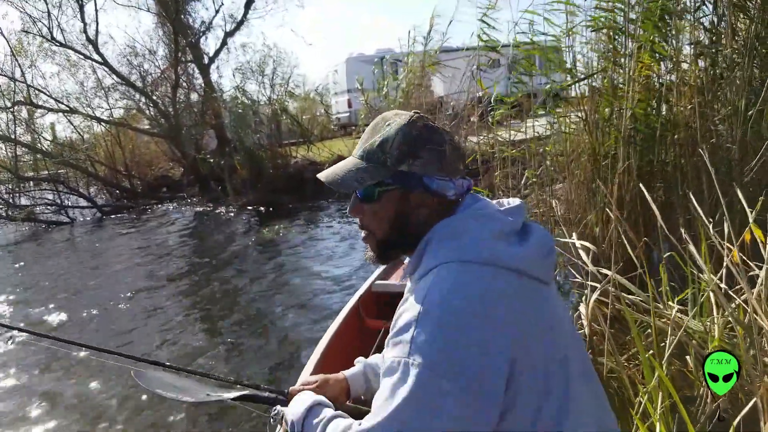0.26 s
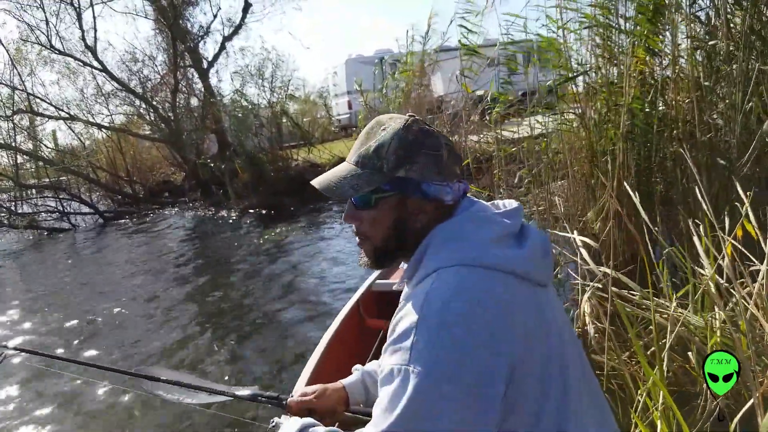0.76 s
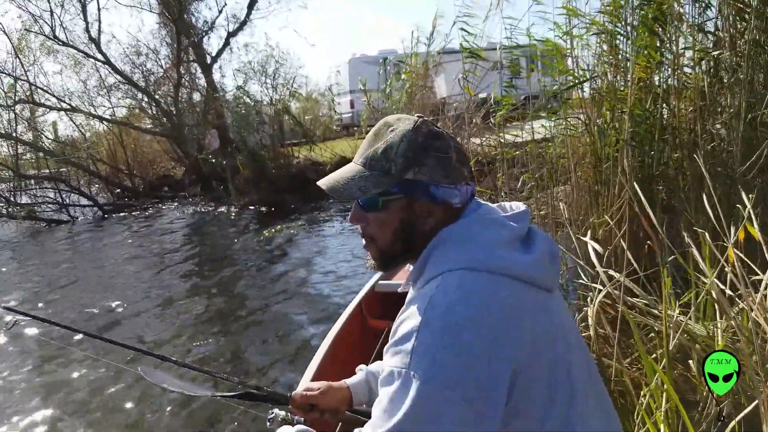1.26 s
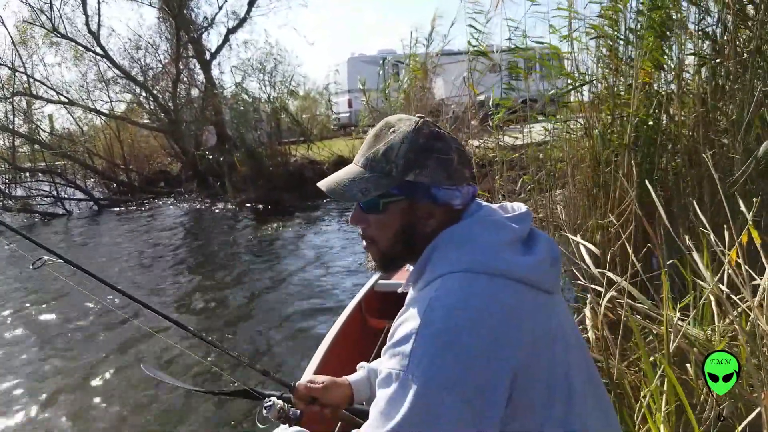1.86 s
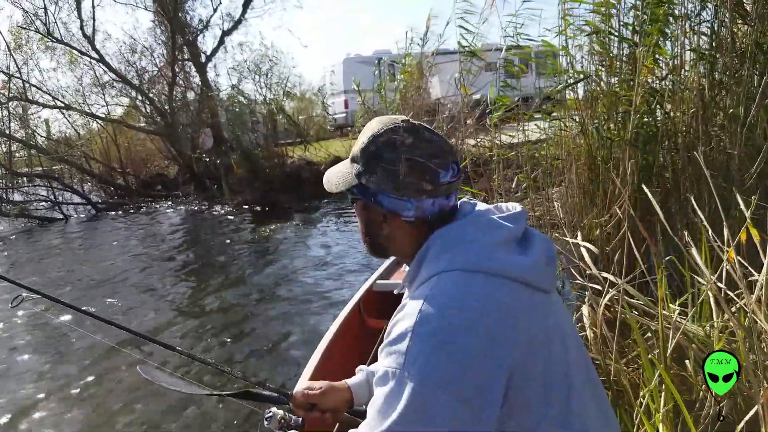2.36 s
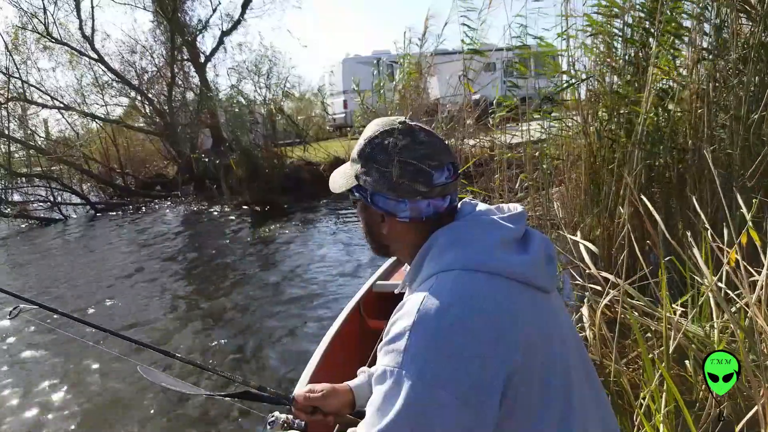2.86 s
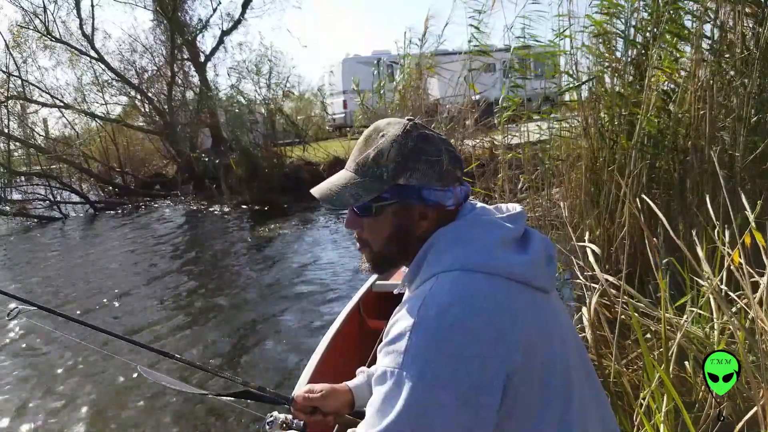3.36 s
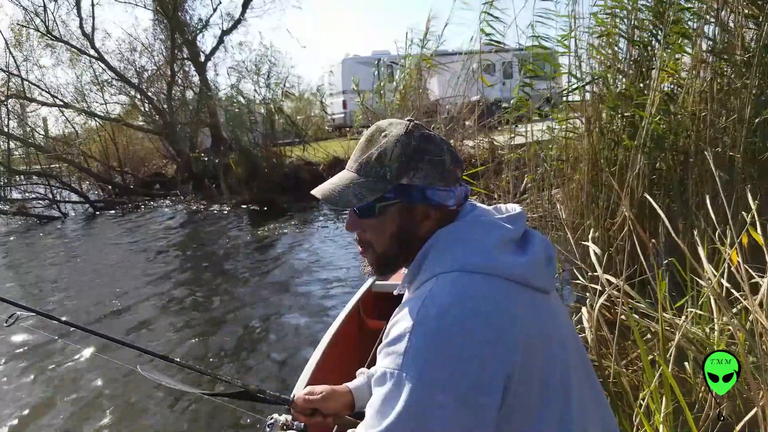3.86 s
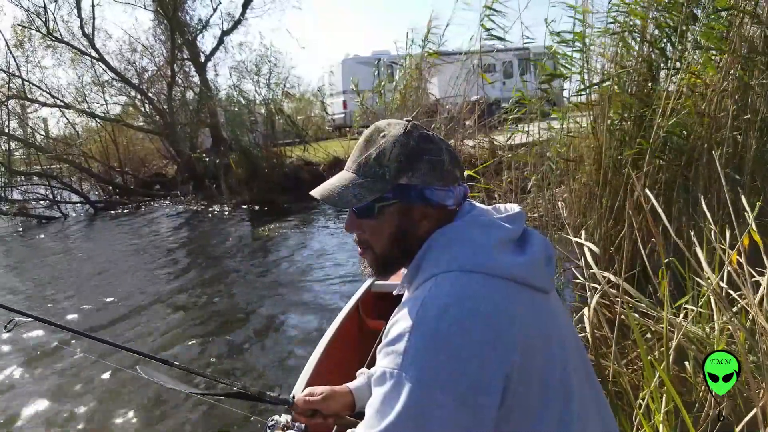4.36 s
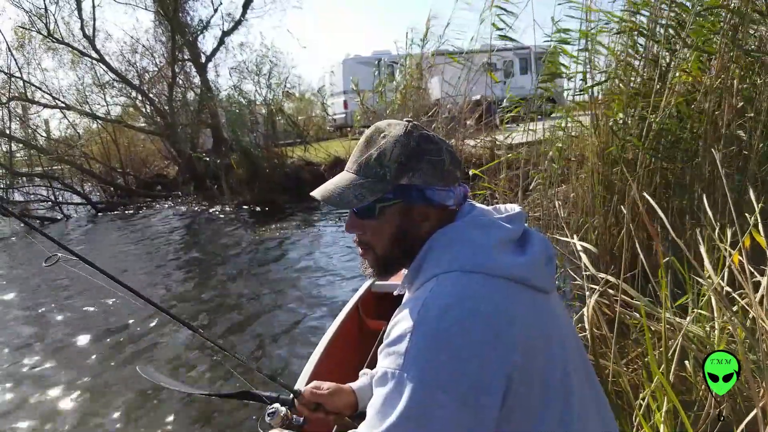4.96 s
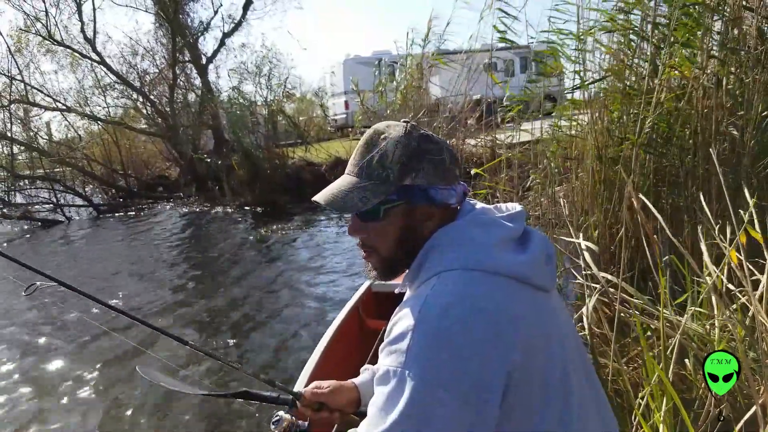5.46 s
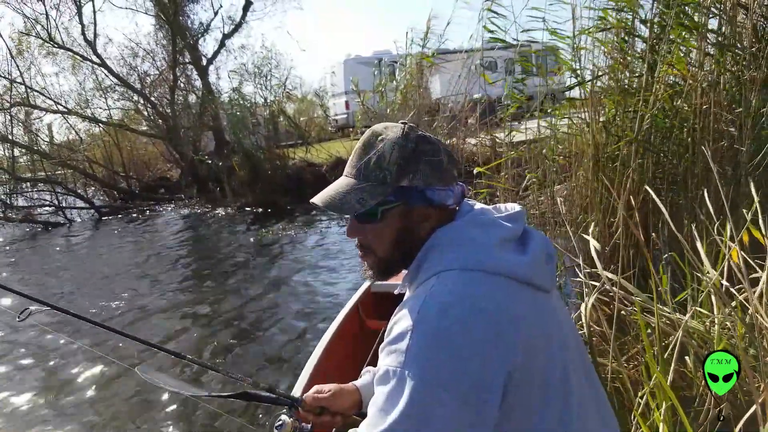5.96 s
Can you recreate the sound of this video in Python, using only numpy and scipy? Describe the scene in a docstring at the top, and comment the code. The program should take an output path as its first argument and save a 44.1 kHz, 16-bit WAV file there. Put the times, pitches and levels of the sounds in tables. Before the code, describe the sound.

Water laps and splashes in short spells against a boat, over rustling reeds and low, thumping gusts of wind.

```python
"""A small boat lies among reeds on a breezy marsh. From the start dry leaves rub and hiss, wind buffets both
microphone ports, and a few trapped bubbles plink by the hull. From about 2 to 3 s wavelets slap, tick and
gurgle against it, throwing a little spray. After a lull the water splashes again near 5 s, and once more
near 6 s, just as the hardest buffet thumps the ports."""
import sys
import numpy as np
from scipy import signal
from scipy.fft import rfft, irfft, next_fast_len
from scipy.io import wavfile

SR = 44100
rng = np.random.default_rng(int(sys.argv[2]) if len(sys.argv) > 2 else 0)


def inscribe(sig):
    """Save sig as 16-bit PCM at rate SR to the path in sys.argv[1].

    A 1-D sig is mono; a 2-D sig holds one channel per row.
    Samples are clipped to [-1, 1] before scaling.
    """
    pcm = np.round(np.clip(np.atleast_2d(sig).T, -1, 1) * 32767)
    wavfile.write(sys.argv[1], SR, pcm.astype(np.int16))


N = 273890

# Wavelets hitting the hull: (time [s], level [dB], pitch [Hz])
SLAPS = [(.655, -55, 877), (.685, -54.5, 520), (0.771, -54, 467), (1.165, -57, 760), (1.246, -45.5, 388),
         (1.596, -50.5, 401), (1.625, -52, 698), (1.7, -52, 764), (1.938, -39, 568), (2.017, -43.5, 500),
         (2.154, -36.5, 888), (2.238, -43, 530), (2.262, -33.5, 735), (2.271, -42, 870),
         (2.276, -40.5, 436), (2.341, -42.5, 620), (2.427, -34.5, 540), (2.45, -36, 790), (2.521, -35, 595),
         (2.534, -40.5, 673), (2.556, -39.5, 550), (2.628, -41, 795), (2.648, -35.5, 862),
         (2.722, -48, 620), (2.806, -37, 732), (2.83, -44.5, 533), (2.88, -42, 750), (2.9, -47.5, 560),
         (3.428, -54.5, 500), (3.585, -53, 452), (4.688, -59, 855), (4.719, -59, 970), (4.812, -54.5, 756),
         (5.004, -46.5, 460), (5.099, -38, 410), (5.126, -36.5, 417), (5.143, -39, 340), (5.15, -37.5, 620),
         (5.166, -36.5, 371), (5.185, -46, 904), (5.198, -49, 586), (5.455, -52.5, 547), (5.58, -34, 202),
         (5.647, -50.5, 443), (5.856, -50.5, 572), (5.909, -41.5, 916), (6.054, -36, 258)]


def slaps():
    """A wavelet smacks the hull: a splat of noise with the hollow tone of an air pocket."""
    return bursts(SLAPS, t60=0.075, octaves=0.41, grain_db=3.0, attack_s=0.00301, pan_db=1.0, hollow=0.34)


# Featured bubbles: (time [s], level [dB], pitch [Hz], splashy share [0-1])
BUBBLES = [(0.057, -47, 3180, 0.01), (.619, -47, 2660, 0.4), (.645, -51, 2480, 0.2), (.662, -52, 2890, 0.8),
           (.665, -59, 3650, .2), (.68, -54, 4050, .4), (.763, -53, 2600, 0.8), (0.791, -52, 2740, 0.6),
           (.922, -54, 2350, 0.7), (1.104, -52, 3010, 0.4), (1.178, -56, 1130, 0.3),
           (1.321, -48.5, 1500, 0.4), (1.386, -52, 3100, 0.9), (1.71, -46, 1515, 0.35),
           (1.718, -51, 2850, 0.6), (1.728, -60, 3670, .4), (1.7272, -47, 1045, 0.25),
           (1.7768, -48, 4300, 0.8), (1.8477, -37, 2340, 0.3), (1.847, -43.5, 1295, 0.25),
           (1.871, -37.5, 1540, 0.3), (1.937, -43, 4520, 0.15), (1.9444, -26.5, 1600, 0.2),
           (1.956, -41.5, 3670, 0.4), (2.017, -44, 1490, 0.92), (2.035, -44, 2550, 0.7),
           (2.08, -38.5, 1510, 0.15), (2.116, -35.5, 2310, 0.6), (2.146, -26, 2410, 0.4),
           (2.162, -32, 2000, 0.76), (2.168, -36, 3590, 0.21), (2.17, -36.5, 1464, 0.45),
           (2.256, -34.5, 1050, 0.93), (2.317, -37.5, 1254, 0.04), (2.338, -34, 1490, 1),
           (2.395, -42, 1690, 0.5), (2.433, -38, 1470, 0.13), (2.437, -41, 2320, 0.2),
           (2.456, -35, 1510, 0.66), (2.523, -39.5, 1550, 0.9), (2.536, -40, 2670, 0.6),
           (2.593, -35.5, 2607, 0.34), (2.649, -39.5, 4050, 0.6), (2.661, -42.5, 1420, 0.3),
           (2.694, -39.5, 1575, 0.34), (2.725, -47.5, 2630, 0.5), (2.808, -45.5, 3400, 0.9),
           (2.821, -44, 1860, 0.6), (2.862, -42, 1730, 0.96), (2.87, -45, 2180, 0.6),
           (2.865, -48, 2930, 0.24), (2.9073, -42.5, 2190, 0.66), (2.941, -48, 2430, 0.7),
           (2.952, -39.5, 1532, 0.23), (2.989, -50, 1620, 0.15), (3.3554, -41, 1440, 0.09),
           (3.68, -41.5, 2510, 0.14), (3.709, -44.5, 2320, 0.9), (3.728, -44, 2420, 0.03),
           (3.771, -50, 6070, 0.26), (4.103, -49, 2550, 0.5), (4.672, -49, 5050, 0.26),
           (4.714, -49.5, 2906, 0.4), (4.874, -52.5, 965, 0.07), (4.91, -36.5, 1660, 0.23),
           (4.913, -31.5, 2290, 0.14), (4.9461, -46, 5000, 0.4), (4.9594, -45, 1460, 0.35),
           (4.972, -34, 2094, 0.15), (5.0072, -44.5, 3890, 0.5), (5.013, -46, 1930, 0.4),
           (5.0464, -43, 1375, 0.25), (5.091, -28.5, 3240, 0.74), (5.101, -29, 4320, 0.6),
           (5.1086, -21.5, 2056, 0.17), (5.121, -52, 1420, 0.7), (5.15, -40, 2130, 0.8),
           (5.157, -38.5, 1390, 0.8), (5.159, -44.5, 4400, 0.3), (5.165, -43.5, 2860, 0.5),
           (5.186, -46, 2680, 0.9), (5.2, -46, 2600, 1), (5.223, -43.5, 4210, 0.5),
           (5.2349, -42, 2120, 0.3), (5.866, -49, 1610, 0.9), (5.905, -39, 1245, 0.4),
           (5.924, -43, 2180, 1), (5.945, -40.5, 2890, 0.55), (5.952, -42, 1800, 0.7),
           (5.98, -53, 1300, 0.7), (5.986, -49, 2500, 0.3), (6.041, -35.5, 1580, 0.35),
           (6.0534, -38.5, 2540, 0.25), (6.0744, -39, 2140, 0.3), (6.124, -49.5, 1380, 0.9),
           (6.153, -47.5, 4470, 0.14)]


def bubbles(attack_s=0.0029, ring_s=0.031, octaves=0.31):
    """Trapped air rings as a sine that glides as the pocket changes shape, mixed with its splash."""
    out, white = np.zeros((2, N)), rng.standard_normal(N + SR)
    wobble = np.pad(from_db(1.5 * drift(110)), (0, SR))
    for (s, db, hz, splashy), (bend, side) in zip(BUBBLES, rng.standard_normal((len(BUBBLES), 2))):
        clean, i = 1 - splashy, round(s * SR)
        t60 = ring_s * (1 + 0.25 * clean) * (2000 / hz) ** 0.17   # clean, large bubbles ring longer
        glide = 0.023 * bend + 0.26 * clean ** 7   # only the cleanest sink much in pitch
        shape = envelope(t60, attack_s, steepen=1.21)
        t = np.arange(len(shape)) / SR
        pitch = hz * (1 + glide * (from_db(-30 * t / t60) - .5))
        tone = np.sin(2 * np.pi * np.cumsum(pitch) / SR) * wobble[i:i + len(t)]
        splash = band_noise(white[i:i + len(t)], hz, octaves) / np.sqrt(2)
        sound = from_db(db) * shape * blend(tone, splash, splashy)
        add(out, s - attack_s, panned(sound, 1.5 + 1.5 * side))
    return out


# Flicks of spray: (time [s], level [dB], centre [Hz])
SPRAY = [(1.3911, -44.5, 11400), (1.4894, -45, 12000), (1.9065, -52, 6770), (1.952, -35, 4120),
         (2.0762, -36.5, 5300), (2.1275, -43, 7040), (2.1535, -31.5, 5500), (2.156, -51, 11500),
         (2.1647, -36, 6130), (2.167, -42, 12000), (2.2523, -39, 6500), (2.311, -45.5, 6300),
         (2.4303, -42, 7500), (2.4594, -46, 6170), (2.5525, -42, 6400), (2.782, -41.5, 9100),
         (2.8373, -46, 7140), (4.0954, -44.5, 4870), (4.556, -46, 12500), (4.96, -42.5, 12500),
         (5.028, -41, 9250), (5.0804, -49, 6900), (5.101, -29, 6160), (5.2234, -45, 10500),
         (5.2375, -43.5, 4260), (5.3826, -43, 13500), (5.814, -40.5, 6900), (5.904, -43.5, 11400),
         (5.9494, -45.5, 11900), (6.0447, -37, 10800), (6.0644, -41, 5430)]


def spray():
    """Thrown water lands as a bright fizz with ringing droplets in it."""
    return bursts(SPRAY, t60=0.057, octaves=0.86, grain_db=3.5, attack_s=0.004, pan_db=3.5, droplets=0.27)


# Sharp accents on the hull: (time [s], level [dB], centre [Hz])
TICKS = [(2.2995, -41, 2000), (2.338, -39, 1500), (2.4345, -32, 1490), (2.458, -35, 1400),
         (2.5335, -30, 1000), (2.648, -32, 1090), (2.807, -38, 1000), (2.899, -35.5, 2300),
         (5.236, -35, 3000), (5.953, -31, 1880)]


def ticks():
    """A wavelet breaks on the hull with a short, wide-band tick."""
    return bursts(TICKS, t60=0.01, octaves=0.9, grain_db=0, attack_s=0.0006, pan_db=1.5)


# Bed of chop between slaps: (time [s], gurgle level [dB], trickle level [dB])
SLOSH = [(0.0, -68.5, -87), (1.91, -68, -72), (1.97, -51, -47), (2.13, -60, -52.5), (2.45, -55, -50),
         (2.75, -57, -54), (2.85, -57, -65), (2.97, -72, -61.5), (3.3, -71.5, -98), (4.72, -74, -75),
         (4.95, -58.5, -70), (5.08, -65, -53), (5.24, -67.5, -72), (5.85, -70.5, -71), (6.09, -54.5, -52.5),
         (6.21, -67, -87)]


def slosh():
    """Large pockets gurgle after all but the deepest slaps; fine bubbles trickle after splashy ones."""
    gurgle_db, trickle_db = automation(SLOSH)
    gurgle = swarm(500, 366, 988, cycles=17.3, spread_db=3.0, swell_cycles=3.9)
    trickle = swarm(1800, 1150, 6500, cycles=40, spread_db=2.8, swell_cycles=20.5)
    hits = [(s, db) for s, db, hz in SLAPS if hz > 330]
    splashes = [(s, db + 10 * np.log10(max(splashy, .01))) for s, db, _, splashy in BUBBLES]
    gurgle = widened(gurgle, share=0.077) * stirred(hits, gurgle_db, send_db=-12.5, t60=0.22)
    trickle = widened(trickle, share=0.27) * stirred(splashes, trickle_db, send_db=-10.5, t60=0.11)
    return panned(gurgle, 0.54) + panned(trickle, 1.0)


# Bands of the water that the housing cancels: (centre [Hz], width [Hz], depth [0-1])
HOUSING_NOTCHES = [(1050, 890, 0.25), (8200, 790, 1)]
# Phase shift around the housing: (frequency [Hz], left port's lead [rad])
HOUSING_PHASE = [(0, 0), (700, .4), (2300, 1.1), (3400, .7), (4800, 0), (6800, -1.0), (9000, 0), (16000, 0)]
# Early reflections off hull and water: (delay [s], level [dB])
REFLECTIONS = [(.0011, -16), (.0023, -16), (.0052, -18)]


def path_to_ports(water):
    """Water sound bends round the housing, notched and phase-shifted; thin reflections widen it."""
    for hz, width_hz, depth in HOUSING_NOTCHES:
        water = water - depth * signal.lfilter(*signal.iirpeak(hz, hz / width_hz, fs=SR), water)
    size = next_fast_len(N)
    turn = np.exp(.5j * np.interp(np.arange(size // 2 + 1) * SR / size, *np.transpose(HOUSING_PHASE)))
    out = irfft(rfft(water, size) * np.array([turn, 1 / turn]), size)[:, :N]
    thin = filtered(water.mean(axis=0), 1, 500, "high")
    for k, (s, db) in enumerate(REFLECTIONS):
        add(out, s, thin * from_db(db) * (-1) ** k * np.array([[1], [-1]]))
    return out


# Hard hits of wind: (time [s], thump level [dB], flutter peak [dB], thump pitch [Hz])
BUFFETS = [(0.766, -40.5, -56, 77), (0.846, -34, -49, 71), (0.921, -33, -49, 84), (0.969, -30.5, -40.5, 71),
           (1.092, -35.5, -46, 70), (1.284, -35, -40.5, 89), (1.497, -38.5, -54, 73),
           (1.877, -32, -46, 64.4), (1.988, -33.5, -46.0, 103), (2.119, -36, -51, 85),
           (2.149, -33, -37.5, 76), (2.279, -34.5, -42.0, 63.6), (2.403, -37.5, -60, 95),
           (2.45, -36.5, -54, 90), (2.482, -35, -56, 65), (2.786, -37.5, -56.0, 77.6),
           (2.992, -38.0, -57, 75), (3.447, -41, -53, 86), (3.774, -33.5, -53, 74), (3.939, -35.5, -69, 73),
           (4.279, -38, -47.5, 77), (4.422, -38.5, -46, 71), (4.554, -34.5, -59, 61),
           (4.712, -32.5, -48.0, 98), (4.755, -45, -46, 83), (4.846, -35.5, -51.5, 72),
           (5.01, -32.5, -45.5, 89), (5.144, -29, -41, 64), (5.411, -37.5, -44, 67), (5.711, -37, -58, 60),
           (5.891, -40.5, -40, 80), (5.978, -29, -48.5, 63), (6.031, -28.5, -49, 67.6),
           (6.087, -25.5, -34, 83.5), (6.14, -39, -47, 107), (6.193, -38, -53, 67.6)]


def buffets(half_width_s=0.011, crest_db=3):
    """Low swings of pressure, uneven between the ports: gives thumps, flutter lift and rumble ducking."""
    thumps, lift, dip = np.zeros((2, N)), np.zeros(N), np.zeros(N)
    t = np.arange(-3 * half_width_s, 3 * half_width_s, 1 / SR)
    bell = np.exp(-(t / half_width_s) ** 2)
    for s, thump_db, flutter_db, hz in BUFFETS:
        turn, uneven = rng.standard_normal(2)
        phase = 2 * np.pi * (hz * t + turn)
        swing = np.sin(phase) + uneven * np.cos(phase) * [[1], [-1]]
        add(thumps, s + t[0], from_db(thump_db) * bell * swing)
        add(lift, s + t[0], from_db(flutter_db - crest_db) * bell)
        add(dip, s + t[0], bell)
    duck = 1 - 0.38 * np.minimum(dip, 1)   # the rumble dips under each thump so the thump stands clear
    return thumps, lift, duck


# Slow swell of the wind: (time [s], rumble level [dB], flutter level [dB])
WIND_SWELL = [(0.0, -49.5, -57.5), (0.41, -52.5, -65.5), (0.74, -48.5, -55.5), (1.87, -48, -58.5),
              (2.09, -43.5, -53), (2.32, -44.5, -55), (2.73, -50.5, -60), (3.18, -50.5, -61),
              (3.7, -51.5, -63), (3.89, -49, -62.5), (4.98, -45.5, -55), (5.4, -45, -60.5),
              (5.9, -43.5, -53.5), (6.1, -39, -50), (6.21, -45, -54)]
# Tone of the eddies: (frequency [Hz], relative level [dB])
WIND_EQ = [(12, -42), (24, -16.5), (49, -3.5), (70, -6), (151, -9), (192, -14), (232, -14), (332, -19.5),
           (476, -27), (527, -32), (1200, -76), (1560, -91), (2640, -120)]


def wind(lump_db=2.5, gust_db=2.5, split_hz=167.6):
    """Eddies hit each port on its own, gusts hit both: lumpy rumble, flutter above it, and buffets."""
    thumps, lift, duck = buffets()
    rumble_gain, flutter_gain = from_db(automation(WIND_SWELL))
    lumps = np.array([drift(30.4), drift(31.0)])
    eddies = rng.standard_normal((2, N)) * from_db(lump_db * lumps + gust_db * drift(5))
    eddies = equalised(eddies, WIND_EQ)
    rumble = rumble_gain * duck * unit_mid(filtered(eddies, 3, split_hz, "low"))
    flutter = np.hypot(flutter_gain, lift) * unit_mid(filtered(eddies, 3, split_hz, "high"))
    return panned(rumble + thumps + flutter, 2.5)


# Breeze in the reed bed: (time [s], level [dB])
REED_SWELL = [(0.0, -47.5), (0.29, -48.5), (1.11, -52), (1.64, -52.5), (1.9, -50), (2.13, -48.5),
              (2.45, -50), (2.72, -50.5), (2.94, -51.5), (4.03, -52), (4.2, -50), (4.76, -54),
              (4.93, -52.5), (5.1, -50), (5.43, -53), (5.66, -53.5), (6.21, -51.5)]
# Tone of the dry leaves: (frequency [Hz], relative level [dB])
REED_EQ = [(470, -19), (800, -16.5), (1520, -11.5), (2260, -8), (2770, -3), (3980, -2), (5240, 0.5),
           (8230, -4.5), (12100, 1), (15200, -7), (16000, 4.5)]


def reeds(near_share=0.22, lag_s=0.00038, flicker_db=1.3, crackle_db=-20.5):
    """Countless leaves rub into a wide hiss that flickers band by band; single leaves snap."""
    lag = round(lag_s * SR)   # the nearest reeds stand to the right, so the left hears them late
    near, *diffuse = rng.standard_normal((3, N))
    near = filtered(near, 2, 9000, "low")   # only the duller part has a direction
    white = blend(np.array(diffuse), np.array([np.roll(near, lag), near]), near_share)
    size = next_fast_len(N)
    band = np.clip(np.log2(np.arange(1, size // 2 + 2) * SR / size / 1000).astype(int), 0, 3)
    spectrum, together, hiss = rfft(equalised(white, REED_EQ), size), drift(24), 0
    for k in range(4):   # split at 2, 4 and 8 kHz
        flicker = from_db(flicker_db * (drift(25.5) + 0.62 * together))
        hiss = hiss + irfft(spectrum * (band == k), size)[:, :N] * flicker
    snaps = swarm(150, 4255, 12900, cycles=59, spread_db=4.5, swell_cycles=17)
    crackle = from_db(crackle_db) * np.array([np.roll(snaps, lag), snaps])
    return (unit_mid(hiss) + crackle) * from_db(automation(REED_SWELL)[0])


def bursts(cues, t60, octaves, grain_db, attack_s, pan_db, droplets=0, hollow=0):
    """One decaying band of noise a cue, with optional shares of droplets and of a rising hollow tone."""
    out, white, shape = np.zeros((2, N)), rng.standard_normal(N + SR), envelope(t60, attack_s)
    white[:N] *= from_db(grain_db * drift(160))
    if droplets:
        drops = swarm(2500, 3016, 14770, cycles=180, spread_db=8.0, swell_cycles=20)
        white[:N] = blend(white[:N], drops, droplets)
    t = np.arange(len(shape)) / SR
    for s, db, hz in cues:
        i = round(s * SR)
        noise = band_noise(white[i:i + len(t)], hz, octaves) / 2
        tone = np.sin(2 * np.pi * hz * t * (1 + 0.13 * t / t60))
        add(out, s - attack_s, panned(from_db(db) * shape * blend(noise, tone, hollow), pan_db))
    return out


def swarm(per_s, low_hz, high_hz, cycles, spread_db, swell_cycles):
    """Clusters of random pings of uneven size, each swelling and ringing at one of 18 pitches; rms 1."""
    sizes = from_db(spread_db * np.minimum(rng.exponential(1, N), 4)) * rng.choice([-1, 1], N)
    born = rng.random(N) < per_s * from_db(4.0 * drift(20)) / SR
    voice, out = rng.integers(0, 18, N), 0
    for k, hz in enumerate(np.geomspace(low_hz, high_hz, 18)):
        kicks, w = sizes * born * (voice == k) + 1e-18, 2 * np.pi * hz / SR
        r = from_db(-60 * hz / (cycles * SR))
        ring = signal.lfilter([0, np.sin(w)], [1, -2 * r * np.cos(w), r * r], kicks)
        r = from_db(-60 * hz / (swell_cycles * SR))   # a second, wider resonance rounds the onset
        out = out + (1 - r * r) / 2 * signal.lfilter([1, 0, -1], [1, -2 * r * np.cos(w), r * r], ring)
    return unit_rms(out)


def stirred(cues, calm_db, send_db, t60):
    """Gain of stirred water: the calm level plus a dying swell at each cue; powers add."""
    power, shape = from_db(2 * calm_db), envelope(t60, attack_s=0.0065) ** 2
    for s, db in cues:
        add(power, s, from_db(2 * (db + send_db)) * shape)
    return np.sqrt(power)


def widened(x, share):
    """Part of a swarm sits elsewhere along the hull and reaches the ports in opposite phase."""
    return blend(x, np.roll(x, N // 3) * [[1], [-1]], share)


def envelope(t60, attack_s, steepen=1.36):
    """A rounded attack and a decay that steepens; peak 1."""
    t = np.arange(int(SR * t60)) / SR
    shape = (1 - np.exp(-(t / attack_s) ** 2)) * from_db(-60 * (t / t60) ** steepen)
    return shape / shape.max()


def drift(hz):
    """Smooth random modulation: noise through a double one-pole low-pass; rms 1."""
    r = np.exp(-80 * np.pi * hz / SR)
    slow = signal.lfilter([1], [1, -2 * r, r * r], rng.standard_normal(N // 40 + 2002))[2000:]
    return np.interp(np.arange(N) / 40, np.arange(len(slow)), unit_rms(slow))


def automation(rows):
    """Breakpoints to curves, one value a sample."""
    s, *columns = np.transpose(rows)
    return [np.interp(np.arange(N) / SR, s, c) for c in columns]


def equalised(noise, eq):
    """Noise shaped by an EQ curve; rms 1."""
    size = next_fast_len(N)
    hz, db = np.transpose(eq)
    grid = np.maximum(np.arange(size // 2 + 1) * SR / size, 1)
    gain = from_db(np.interp(np.log(grid), np.log(hz), db))
    return unit_rms(irfft(rfft(noise, size) * gain, size)[..., :N])


def band_noise(noise, hz, octaves):
    """Noise kept within some octaves either side of a centre; rms 1."""
    edges = np.clip([hz * 2 ** -octaves, hz * 2 ** octaves], 50, .45 * SR)
    return unit_rms(filtered(noise, 2, edges, "band"))


def filtered(x, order, hz, kind):
    """A flat low-, high- or band-pass."""
    return signal.sosfilt(signal.butter(order, hz, kind, fs=SR, output="sos"), x)


def blend(a, b, share):
    """Equal-power crossfade from a to b."""
    return np.sqrt(1 - share) * a + np.sqrt(share) * b


def panned(x, pan_db):
    """Stereo, with the left louder by pan_db."""
    return x * from_db([[pan_db / 2], [-pan_db / 2]])


def add(out, s, sound):
    """Mix a sound in at s seconds."""
    i = round(s * SR)
    out[..., i:i + sound.shape[-1]] += sound[..., :N - i]


def from_db(db):
    """Decibels to gain."""
    return 10 ** (np.asarray(db) / 20)


def unit_rms(x):
    """Scale to rms 1."""
    return x / np.sqrt(np.mean(x ** 2) + 1e-20)


def unit_mid(x):
    """Scale a stereo pair so that its mid has rms 1."""
    return x / np.sqrt(np.mean(x.mean(axis=0) ** 2) + 1e-20)


def scene():
    """Water on the hull up front, over a bed of wind and reeds."""
    water = slaps() + spray() + ticks() + slosh() + bubbles()
    return path_to_ports(water) + wind() + reeds()


def record(dry):
    """The left port's cavity adds a broad presence lift; the top of both channels is cut steeply."""
    port_hz, width_hz, lift_db, cutoff_hz = 4050, 7300, 2.5, 15830
    cavity = signal.lfilter(*signal.iirpeak(port_hz, port_hz / width_hz, fs=SR), dry[0])
    left = dry[0] + (from_db(lift_db) - 1) * cavity
    return signal.sosfilt(signal.ellip(14, .5, 70, cutoff_hz, fs=SR, output="sos"), [left, dry[1]])


dry = scene()
out = record(dry)
inscribe(out)
```